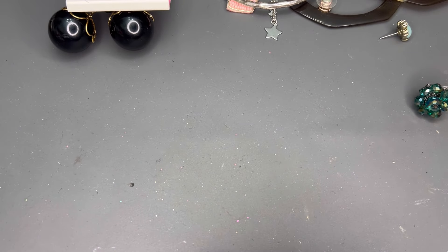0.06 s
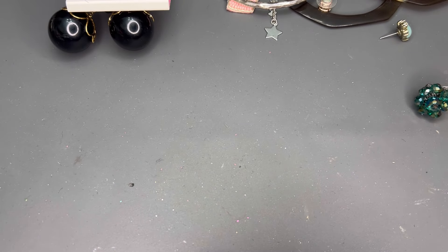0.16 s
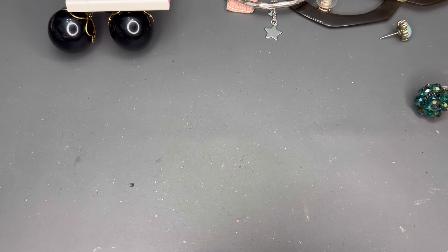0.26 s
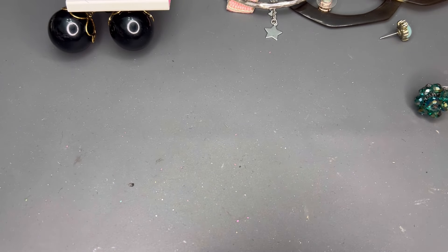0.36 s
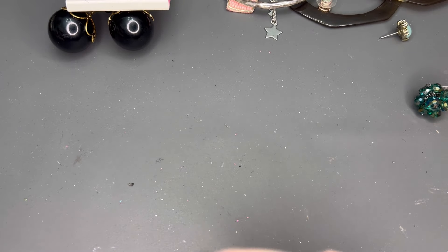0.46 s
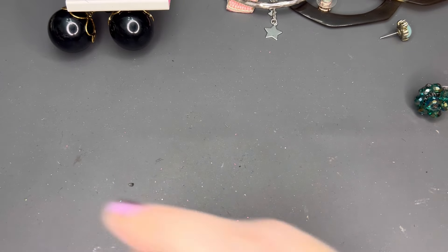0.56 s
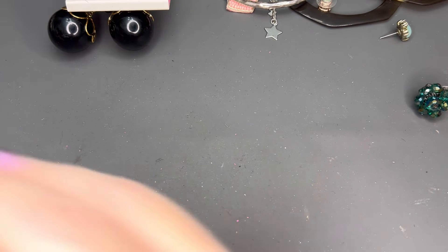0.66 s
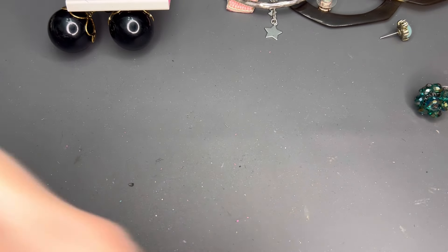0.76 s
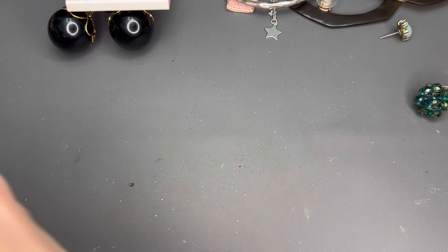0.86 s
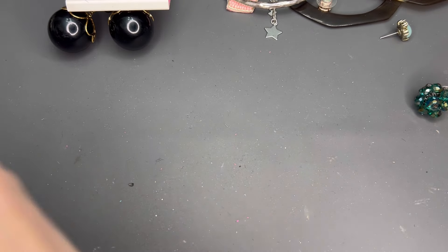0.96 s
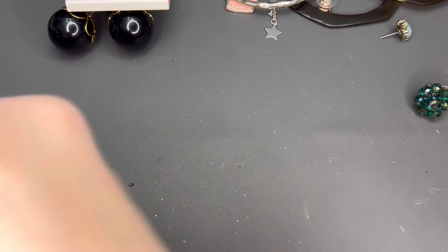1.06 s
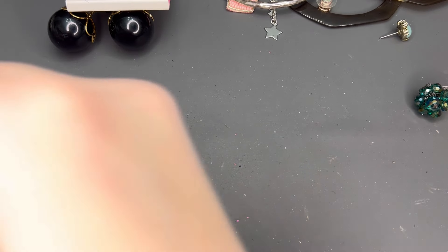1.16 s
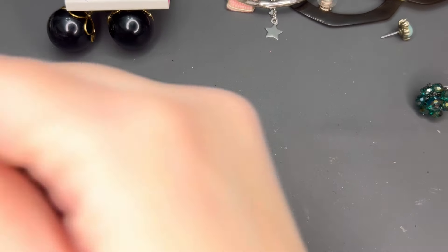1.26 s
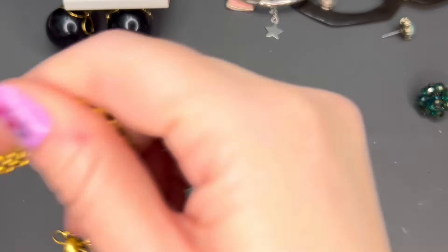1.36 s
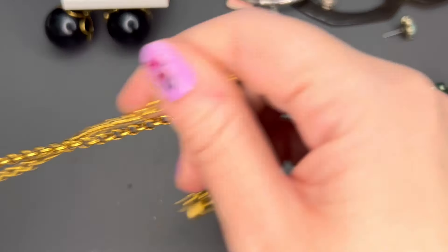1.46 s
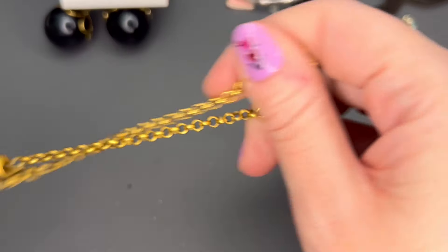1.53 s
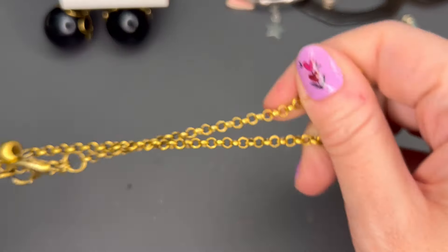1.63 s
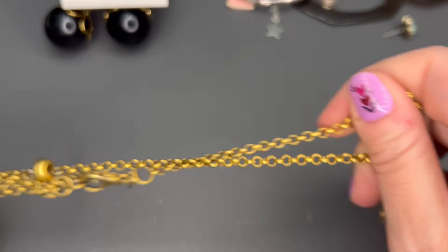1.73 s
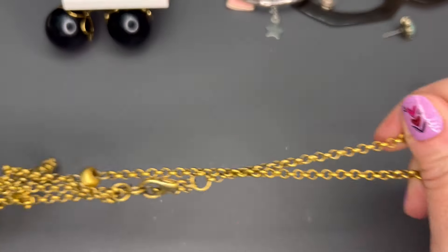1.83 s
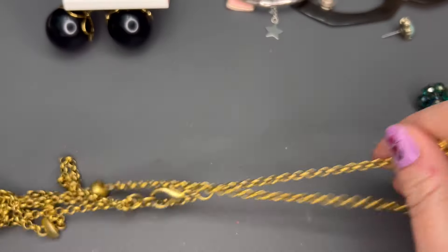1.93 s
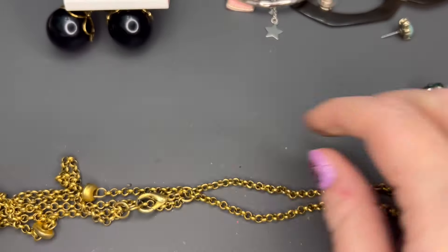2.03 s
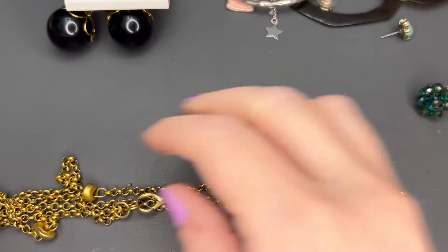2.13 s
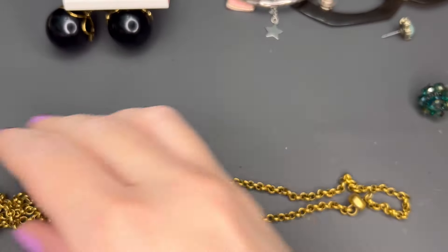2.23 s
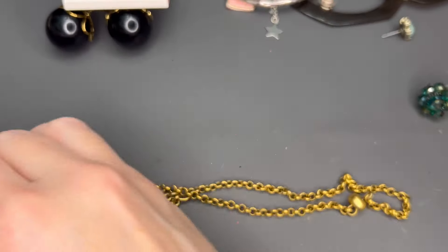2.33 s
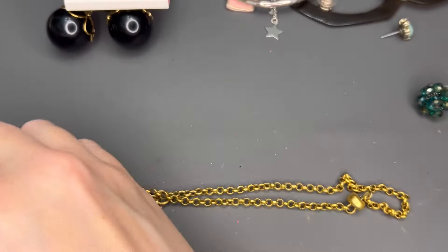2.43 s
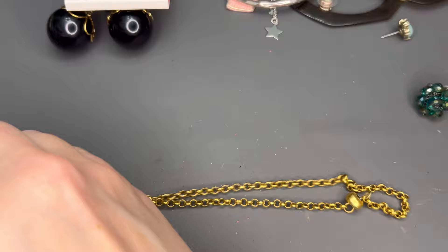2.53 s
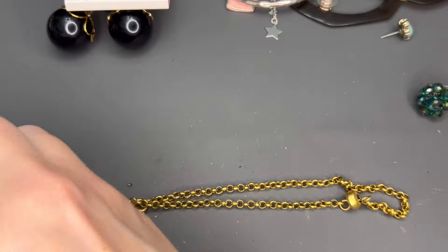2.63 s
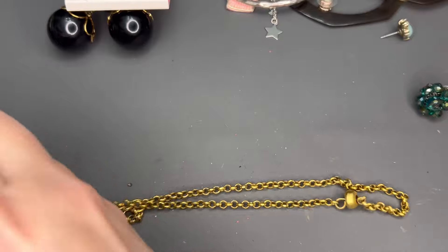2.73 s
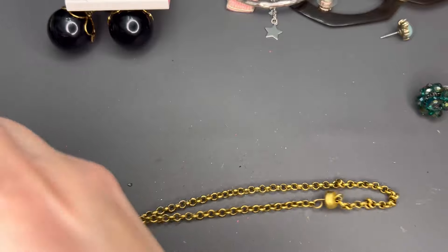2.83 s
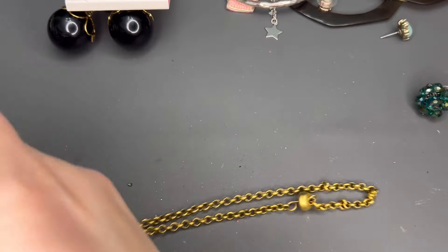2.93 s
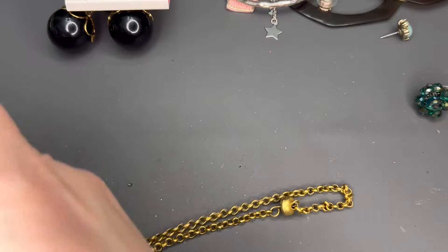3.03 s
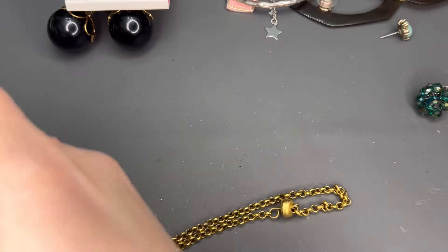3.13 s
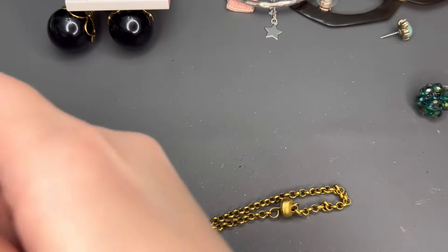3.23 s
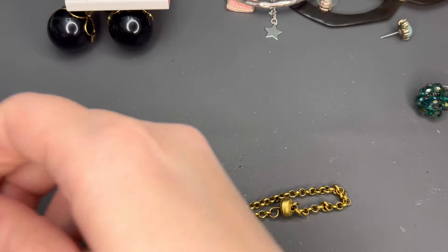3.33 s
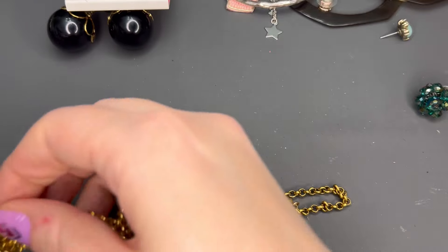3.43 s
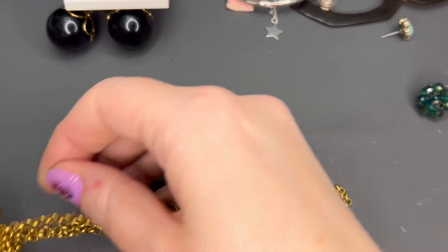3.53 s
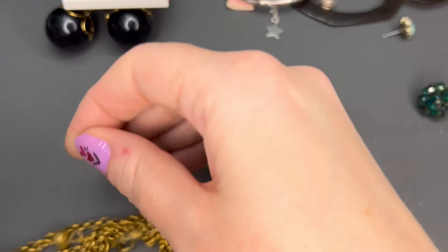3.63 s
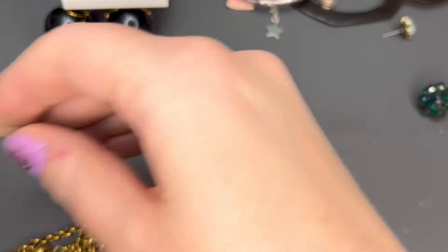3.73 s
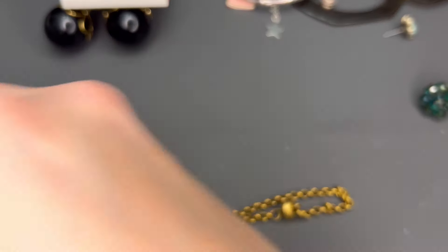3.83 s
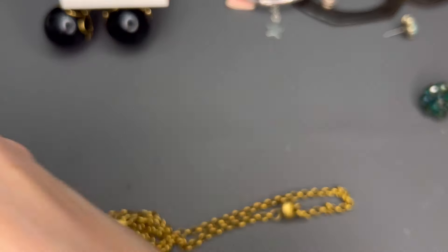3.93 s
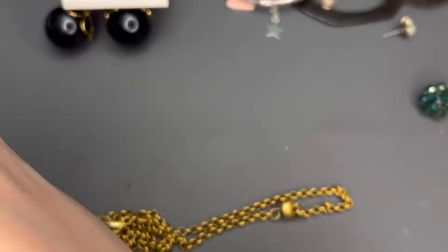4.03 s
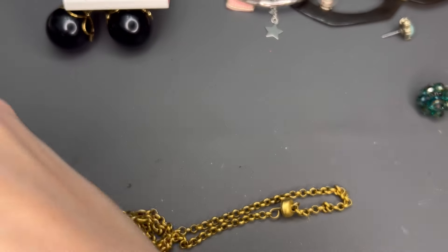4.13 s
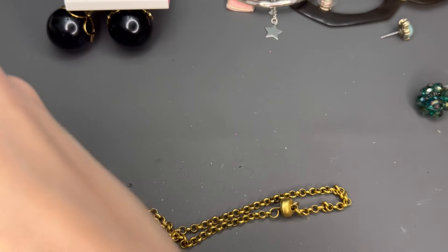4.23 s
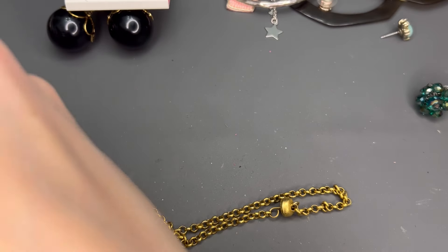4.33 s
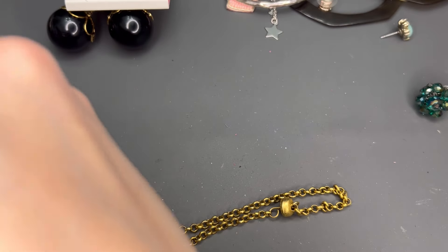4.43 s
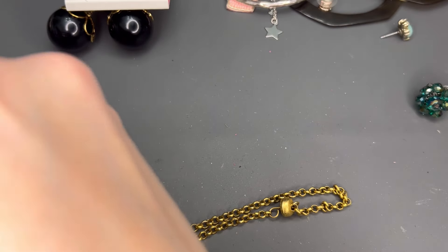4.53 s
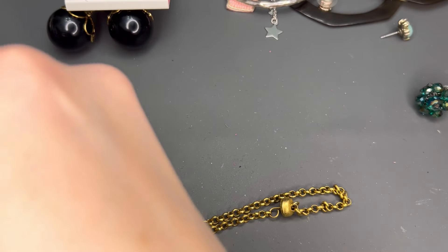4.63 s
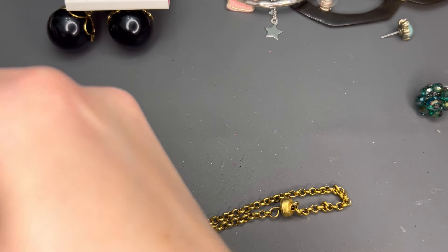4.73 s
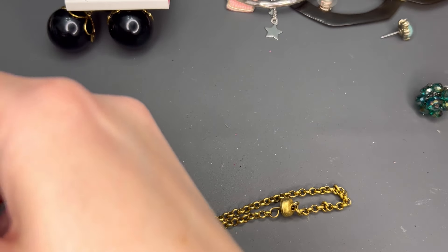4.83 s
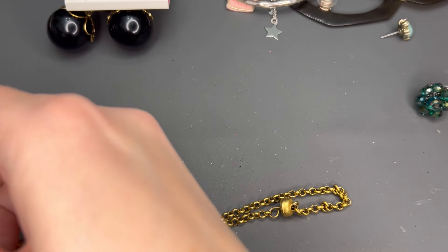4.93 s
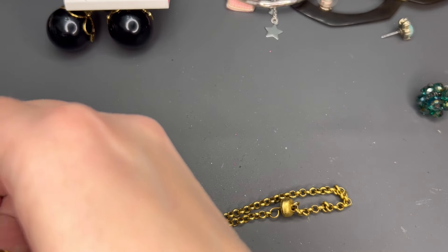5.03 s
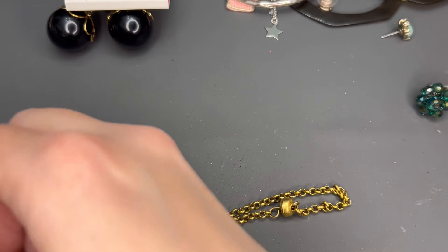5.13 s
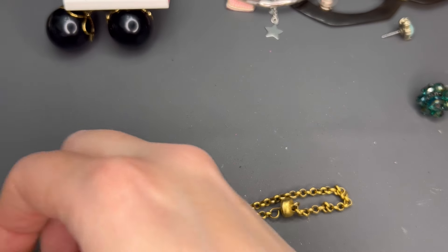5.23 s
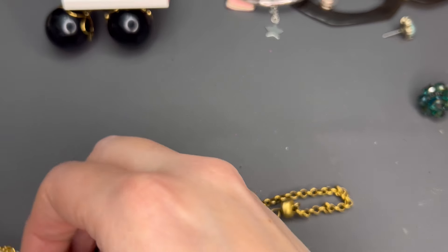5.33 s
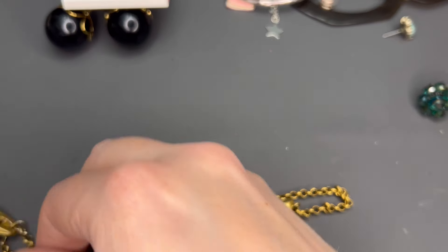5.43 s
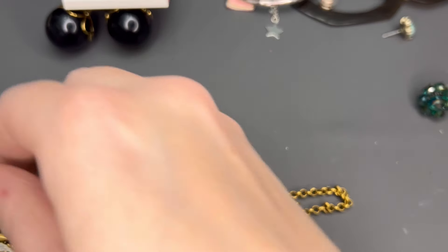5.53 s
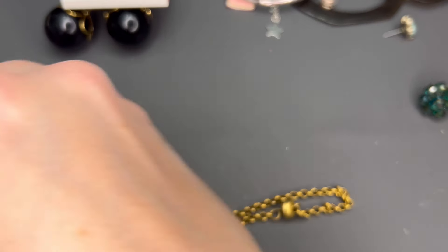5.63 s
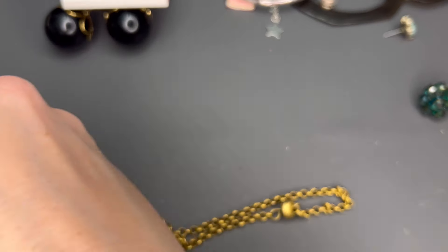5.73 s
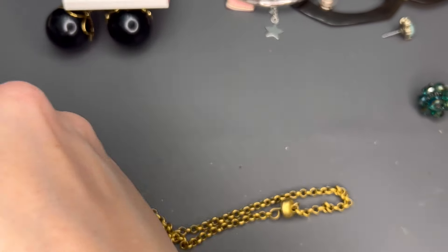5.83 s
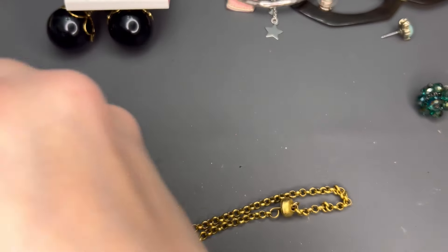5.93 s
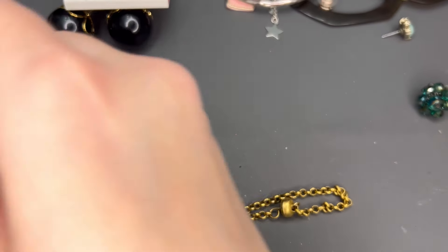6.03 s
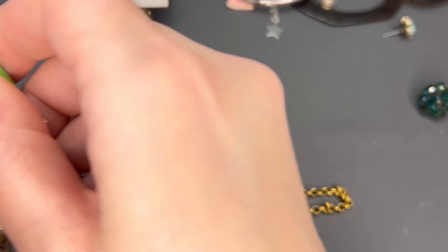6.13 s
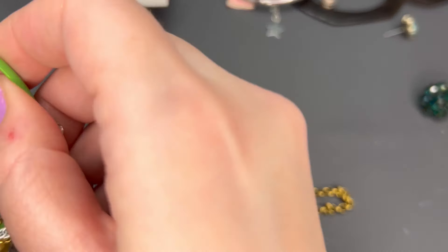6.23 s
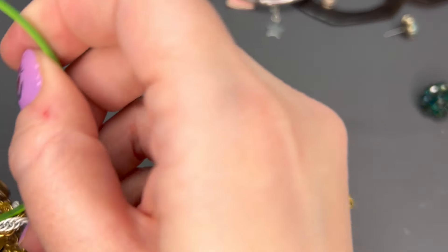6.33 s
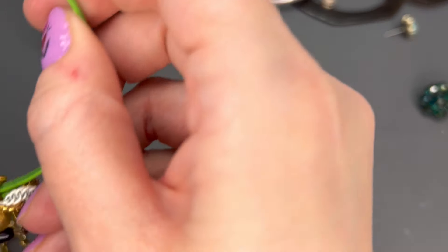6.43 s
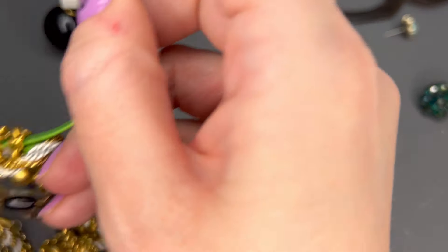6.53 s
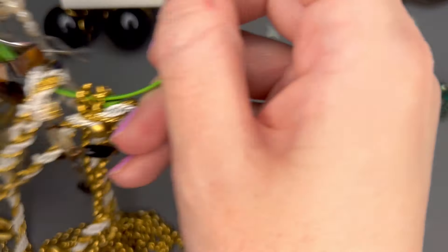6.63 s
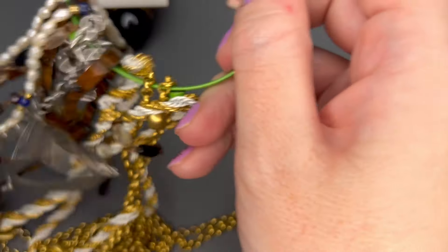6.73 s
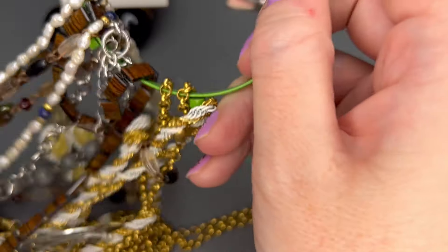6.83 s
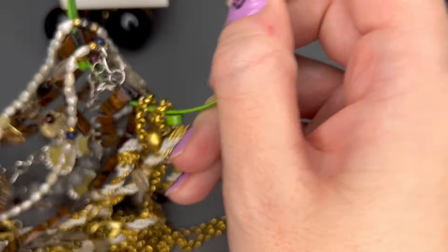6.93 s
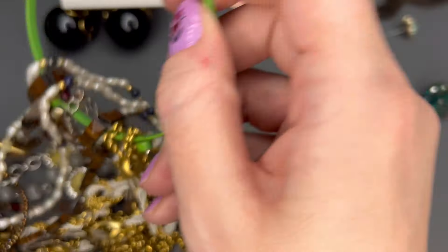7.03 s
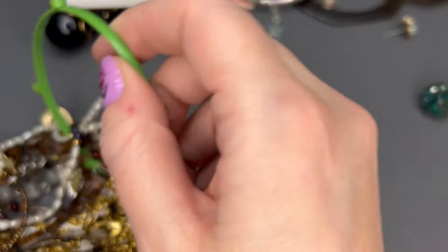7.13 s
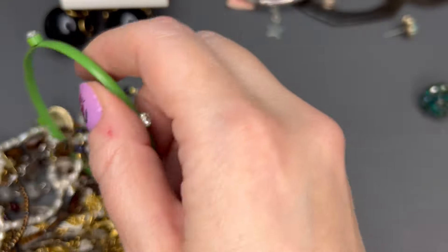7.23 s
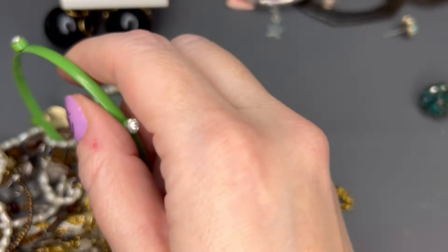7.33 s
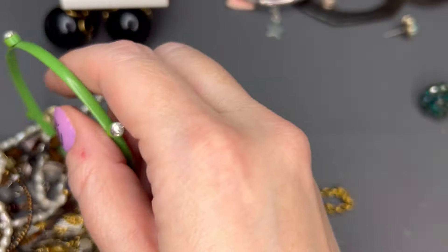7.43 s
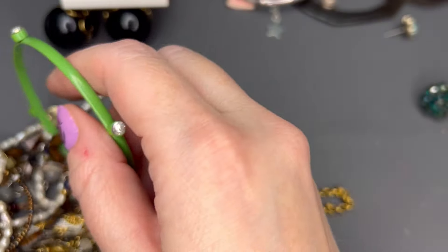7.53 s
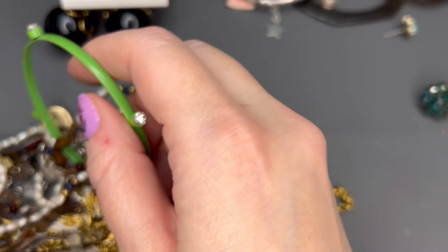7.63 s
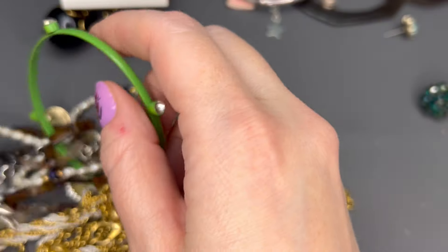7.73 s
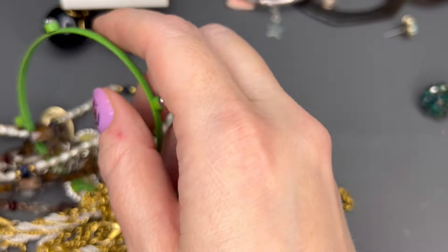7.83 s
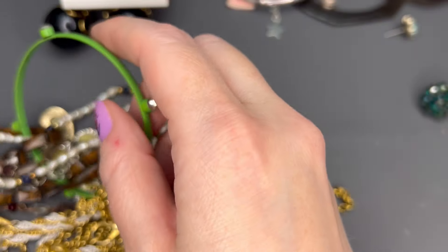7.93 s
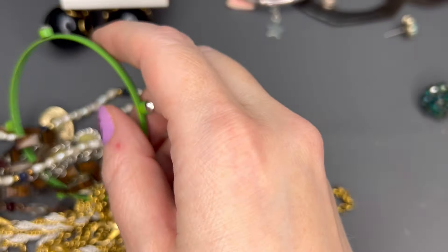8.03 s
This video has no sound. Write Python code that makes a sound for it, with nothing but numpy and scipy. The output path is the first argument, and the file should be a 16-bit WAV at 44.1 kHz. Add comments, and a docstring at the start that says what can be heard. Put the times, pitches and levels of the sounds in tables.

```python
"""At a table in a room with a low hum, a hand stirs a heap of bead necklaces, chains and bangles.
Random contacts ring small bead and link bodies into a bright rustle that tugs lift and pauses drop.
Over it, placed decaying modes and noise bursts make snaps, bare ticks, taps, chain falls and pings;
thumps glide down in pitch and leave the table shaking, as filtered noise. A wavering tone is the hum.
A two-port microphone hears it with a wandering lead and balance."""
import sys
import numpy as np
from scipy import signal
from scipy.io import wavfile
from scipy.ndimage import uniform_filter1d

SR = 44100
rng = np.random.default_rng(int(sys.argv[2]) if len(sys.argv) > 2 else 0)


def dump_mix(stems):
    """Bounce the given channels to the path in sys.argv[1] as a 16-bit WAV at rate SR."""
    frames = np.atleast_2d(stems).T  # one column per channel
    limited = np.clip(frames, -1, 1)  # hard clip at full scale
    pcm = np.round(limited * 32767).astype(np.int16)
    wavfile.write(sys.argv[1], SR, pcm)


N = 355446  # length in samples

# Knuckles and heavy pieces thumping the table.
# Each row: start in seconds, level in dB, height in Hz from which the pitch glides down towards 75 Hz.
THUMP_HITS = [(1.768, -35.5, 710), (3.615, -35.5, 695), (3.643, -34.5, 726), (5.2908, -29.5, 695),
              (5.322, -33, 620), (5.9, -33.5, 986), (6.02, -34, 800), (6.558, -36.5, 962),
              (6.749, -31, 710)]
# Spectrum of contacts on the table top. Each row: frequency in Hz, gain in dB.
TABLE_TONE = [(300, -6), (600, -5.5), (1200, -7), (2300, -1), (3200, -3.5), (4500, -3.5), (6500, -2.5),
              (10000, -8)]
# Spectrum of the shaken table. Each row: frequency in Hz, gain in dB.
SHAKE_TONE = [(25, -35.5), (50, 3.5), (80, 2), (160, -5.5), (330, -5.5), (700, -16.5), (2500, -75.5)]
# Modes of the table top. Each row: frequency in Hz, strength in dB.
BOARD_MODES = [(350, 3.5), (540, -1.5), (850, -6.5), (1050, 0.5), (1225, 1), (1455, 4), (1700, -4),
               (2020, 1.5), (2330, 4), (2870, 0)]


def gain_of(db):
    """Amplitude factor for a level in dB."""
    return 10 ** (np.asarray(db) / 20)


def evened(x):
    """Scale a signal to an RMS of 1."""
    return x / np.sqrt(np.mean(abs(x) ** 2) + 1e-20)


def read(points, hz):
    """Read a curve of (Hz, value) points, straight between points on a log frequency axis."""
    f, value = np.transpose(points)
    return np.interp(np.log(hz + 1), np.log(f + 1), value)


def add(mix, s, sound):
    """Mix a sound in at s seconds, cut off at the end of the mix."""
    part = mix[round(s * SR):][:len(sound)]
    part += sound[:len(part)]


def colour(x, points):
    """Causal filter with the given spectrum (minimum phase)."""
    log_gain = np.log(gain_of(read(points, abs(np.fft.fftfreq(8192, 1 / SR)))))
    response = np.exp(log_gain - 1j * signal.hilbert(log_gain).imag)
    taps = np.fft.ifft(response).real[:4096]
    return signal.oaconvolve(x, taps * np.hanning(8192)[4096:])[:len(x)]


def ring(hz, t60, rise):
    """A decaying mode with a soft start and a peak near 1; t60 and rise in seconds."""
    t = np.arange(round(t60 * SR)) / SR
    shape = gain_of(-60 * t / t60) * (1 - np.exp(-t / rise))
    return shape / shape.max() * np.sin(2 * np.pi * hz * t)


def burst(noise, t60):
    """Noise dying by 60 dB in t60 seconds, scaled to a peak of 1."""
    dying = noise * gain_of(-60 * np.arange(len(noise)) / SR / t60)
    return dying / abs(dying).max()


def clumps(seconds, depth_db):
    """Contacts come in bunches: a strand slips suddenly, then settles."""
    slips = rng.exponential(1, N) * (rng.random(N) < 2 / (seconds * SR))
    settling = signal.lfilter([1], [1, -np.exp(-2 / (seconds * SR))], slips - slips.mean())
    return gain_of(depth_db * evened(settling))


def stir():
    """Gains per sample for beads, links and table: the hand's level, lifted by tugs, lowered in pauses."""
    # How busy the hand is, before tugs and pauses. Each row: time in seconds, beads rubbing in dB,
    # links on the table in dB, table shaken in dB.
    busy = [(0, -59.5, -59.5, -58), (.5, -59.5, -55, -55.5), (.93, -53, -62, -59), (1.0, -61.5, -48.5, -50),
            (1.45, -48, -55, -51.5), (1.85, -48.5, -44.5, -48), (2.25, -55, -49, -54),
            (2.95, -52, -55.5, -58), (3.452, -53, -54.5, -58), (4.15, -63, -60, -59.5),
            (4.7, -56.5, -63, -58), (5.05, -44.5, -52, -53.5), (5.501, -56, -53.5, -51.5),
            (5.799, -44, -52, -56.5), (6.05, -30, -39, -47.5), (6.25, -47, -54, -52.5),
            (6.7, -31.5, -45.5, -49.5), (7.0, -45.5, -49.5, -52.5), (7.35, -49, -54, -56.5),
            (7.65, -30.5, -52.5, -56), (8.06, -52.5, -53.5, -52)]
    # Tugs at the strands, quick to rise and mostly slower to fall. Each row: top in seconds,
    # fall time in seconds, lift of the beads in dB, lift of the links in dB.
    tugs = [(0.2, 0.035, 15, 8.5), (.39, 0.18, 10, -1.5), (0.911, 0.039, 4, 11.5), (1.039, 0.61, 15.5, 4.5),
            (1.358, 0.052, 2, 10), (1.766, 0.027, 10, 10.5), (1.845, 0.038, 11.5, 6),
            (2.464, 0.068, 9, 2.5), (2.614, 0.14, 5.5, 2), (2.784, 0.17, 4, 6), (3.293, 0.082, 4, 8),
            (3.633, 0.12, -3, 13.5), (3.951, 0.044, 18.5, 10.5), (4.081, 0.056, 3, 13.5),
            (4.591, 0.11, 8, 7.5), (4.809, 0.2, 4.5, 7), (5.228, 0.035, 12, 5.5), (5.477, 0.047, 9.5, 4.5),
            (5.915, 0.078, 5.5, 5.5), (6.275, 0.29, 7.5, 9), (6.705, 0.047, 5, 2.5), (6.815, 0.15, 3, 8),
            (7.084, 0.052, 11, -1), (7.263, 0.046, 8.5, 8), (7.603, 0.16, -4.5, 9.5),
            (7.953, 0.074, 12.5, 2)]
    # The strands hang still. Each row: dying from in seconds, stirred again at in seconds,
    # full drop of the beads in dB, full drop of the links in dB.
    pauses = [(-.2, 0.047, 12, 14), (1.907, 2.124, 26, -4), (2.004, 2.127, 9, 26.5), (3.302, 3.507, 10, 8),
              (4.21, 4.52, 15, 19), (5.29, 5.407, 12, 0.5), (5.544, 5.684, 42, 34)]
    tug_rise_s, settle_s, restart_s = 0.049, 0.089, 0.04
    shake_share = 0.19  # the table follows this share of the links' change in dB
    jolt_db, jolt_t60_s = -16, 0.19  # each thump leaves the table shaking

    t = np.arange(0, N + 64, 64) / SR  # one step per 64 samples
    change = 0
    for top, fall_s, *lift_db in tugs:
        tug = np.interp(t, [top - tug_rise_s, top, top + fall_s], [0, 1, 0])
        change = change + np.outer(lift_db, tug)
    for start, end, *drop_db in pauses:
        still = np.clip(np.minimum((t - start) / settle_s, 1 + (end - t) / restart_s), 0, 1)
        change = change - np.outer(drop_db, still)

    times, *levels = np.transpose(busy)
    beads, links, shake = (np.interp(t, times, db) for db in levels)
    shake = gain_of(shake + shake_share * change[1])
    for s, db, _ in THUMP_HITS:
        shake = shake + (t > s) * gain_of(db + jolt_db - 60 * abs(t - s) / jolt_t60_s)
    gains = gain_of(beads + change[0]), gain_of(links + change[1]), shake
    return [np.interp(np.arange(N) / SR, t, g) for g in gains]


def room():
    """Steady filtered noise, and a hum whose strength and phase waver with slow random noise."""
    # Spectrum of the room noise. Each row: frequency in Hz, density in dB per Hz.
    room_tone = [(25, -42), (60, -23), (130, 8), (330, -20), (500, -17.5), (1300, -10.5), (4000, -64),
                 (16000, -66)]
    room_db, hum_db, hum_hz, hum_width_hz = -62, -60.5, 120, 12
    air, a, b = rng.standard_normal((3, N))
    r = np.exp(-np.pi * hum_width_hz / SR)
    waver = 1.3 + evened(signal.lfilter([1 - r], [1, -r], a + 1j * b))
    hum = (waver * np.exp(2j * np.pi * hum_hz * np.arange(N) / SR)).real
    return gain_of(room_db) * evened(colour(air, room_tone)) + gain_of(hum_db) * evened(hum)


def table_rumble(shaking):
    """The shaken table rumbles: low noise in bunches, following the stirring and the thumps."""
    rumble = colour(rng.standard_normal(N), SHAKE_TONE)
    return shaking * evened(rumble * clumps(.03, 2.2))


def thump(noise, hz):
    """Bending waves in the table top: high ones arrive first, low ones trail in; two low modes ring on."""
    t = np.arange(len(noise)) / SR
    pitch = 75 + hz / (1 + t / 0.00385)
    wave = gain_of(-60 * t / .065) * np.sin(2 * np.pi * np.cumsum(pitch) / SR)
    wave = wave + 0.82 * burst(colour(noise, SHAKE_TONE), 0.058)
    for mode_hz, db in BOARD_MODES[:2]:
        add(wave, 0, gain_of(db - 15) * ring(mode_hz, 0.096, 0.00094))
    return wave


def thumps():
    """Each heavy blow sets off bending waves in the table top."""
    out = np.zeros(N)
    for s, db, hz in THUMP_HITS:
        add(out, s, gain_of(db) * thump(rng.standard_normal(5000), hz))
    return out


def knock(noise, hz):
    """The table top answers a contact with a dull crack and a few short modes; low modes ring longer."""
    body = 1.5 * burst(colour(noise, TABLE_TONE), .012)
    add(body, 0, 0.16 * ring(BOARD_MODES[1][0], 0.026, 0.00054))
    for ratio, size in [(1, 1), (1.6, .4)]:
        add(body, 0, size * ring(hz * ratio, 0.0055 + 9 / hz, 0.00035))
    return body


def taps():
    """Links and clasps strike the table, each exciting a knock at its own pitch."""
    # Each row: start in seconds, level in dB, main mode in Hz.
    strikes = [(0.121, -41, 2700), (0.138, -30, 614), (0.199, -36.5, 2810), (0.233, -29.5, 2280),
               (0.279, -46, 570), (0.326, -47, 560), (0.3412, -29, 2400), (0.512, -26.5, 3650),
               (1.24, -34.5, 1110), (2.175, -36, 2200), (2.791, -42, 2660), (3.042, -38.5, 515),
               (4.057, -35, 3230), (4.217, -43, 2230), (4.588, -45.5, 583), (4.964, -30, 2330),
               (5.029, -34, 656), (5.3475, -32.5, 2058), (5.706, -42, 2560), (5.879, -33.5, 760),
               (6.018, -33, 2500), (6.0455, -25, 2530), (6.268, -27, 2520), (6.394, -29.5, 2410),
               (6.5575, -32, 700), (6.582, -34.5, 2400), (6.689, -30.5, 3470), (6.937, -27, 1840),
               (7.058, -34.5, 1950), (7.153, -34, 2030), (7.58, -32, 2170)]
    out = np.zeros(N)
    for s, db, hz in strikes:
        add(out, s, gain_of(db) * knock(rng.standard_normal(1200), hz))
    return out


def chain_fall(seconds, fade_db, top_hz):
    """Links land a few milliseconds apart; each rings the table modes in its own mix, dull above top_hz."""
    out = np.zeros(round(seconds * SR) + 1500)
    for s in np.arange(0, seconds, .0026):
        late, size, mix = rng.random(), rng.standard_normal(), rng.standard_normal(len(BOARD_MODES))
        # the first link has a set level and moment, the others vary
        level = gain_of(3.4 * size * (s > 0) + 2.9 * (s == 0) + fade_db * s / seconds)
        at = s + 0.0017 * late * (s > 0)
        add(out, at, level * 5.0 * burst(rng.standard_normal(60), 0.0019))
        for (hz, db), share in zip(BOARD_MODES, mix):
            add(out, at, level * share * gain_of(db) * ring(hz, 0.0065 + 8 / hz, 0.000079))
    dull = [(300, -14), (.4 * top_hz, 0), (top_hz, 0), (1.6 * top_hz, -8), (4 * top_hz, -28)]  # (Hz, dB)
    return evened(colour(out, dull))


def chain_falls():
    """Lengths of chain fall on the table link after link."""
    # Each row: start in seconds, end in seconds, level in dB, drift of the link level by the end in dB,
    # dull above in Hz.
    drops = [(1.747, 1.77, -46, -15, 3620), (1.919, 1.939, -46, 0.5, 2280), (1.942, 1.96, -35.5, 5, 2270),
             (1.961, 1.972, -32, -4, 2320), (1.975, 2.012, -35.5, -5.5, 2420),
             (3.6121, 3.663, -36.5, -10, 2890), (5.271, 5.294, -42.5, -1.5, 4600)]
    out = np.zeros(N)
    for s, end, db, fade_db, hz in drops:
        add(out, s, gain_of(db) * chain_fall(end - s, fade_db, hz))
    return out


def pings():
    """Small metal parts ring until a touch damps them."""
    # Each row: start in seconds, level in dB, pitch in Hz, free decay by 60 dB in seconds,
    # damped after in seconds.
    metal = [(6.346, -33, 8900, .1, .012), (6.7535, -27, 13890, .045, .011),
             (6.7616, -10.5, 8863, .16, .024)]
    out = np.zeros(N)
    for s, db, hz, t60, damped in metal:
        tone = ring(hz, t60, .0004)
        late = np.maximum(np.arange(len(tone)) / SR - damped, 0)
        add(out, s, gain_of(db - 1500 * late) * tone)  # the touch takes 1500 dB per second
    return out


def crack(noise):
    """A hard contact: a few milliseconds of bright splinters."""
    return burst(0.46 * np.diff(noise) + noise[1:], .007)


def ticks():
    """Hard edges meet in a bare click with no ring."""
    # Each row: start in seconds, level in dB.
    clicks = [(0.152, -40), (0.2337, -13), (0.2802, -25), (.667, -22), (1.112, -32), (1.499, -24),
              (1.633, -17), (1.672, -13.5), (1.732, -32), (1.7532, -11), (1.767, -14), (1.861, -25),
              (2.174, -23), (2.1778, -16.5), (2.218, -28), (2.224, -29), (2.348, -28), (2.408, -19),
              (2.456, -12), (2.5184, -30), (2.665, -16.5), (3.1865, -41), (3.282, -19.5), (3.652, -24.5),
              (4.509, -40.5), (4.9225, -33), (5.4656, -30), (5.7475, -20), (5.776, -41), (5.808, -21.5),
              (6.022, -7.5), (6.025, -9), (6.032, -16), (6.529, -30), (7.045, -21), (7.2042, -23),
              (7.2899, -16.5), (7.592, -14), (7.945, -27), (8.046, -23.5)]
    out = np.zeros(N)
    for s, db in clicks:
        add(out, s, gain_of(db) * crack(rng.standard_normal(800)))
    return out


def snaps():
    """Single beads snap together: a very short ring and a broad crack."""
    # Each row: start in seconds, level of the ring in dB, ring in Hz,
    # crack against the ring in dB before a 6 dB lift.
    bead_hits = [(0.3411, -27.5, 4460, 3), (0.512, -12.5, 11100, -4.5), (0.5471, -18.5, 11000, -3.5),
                 (0.5573, -37, 11200, -15), (0.5737, -20.5, 10500, -1.5), (0.846, -27, 9500, -9),
                 (0.8954, -22, 15100, -9), (1.033, -28.5, 6900, -12), (1.148, -31, 6600, -2),
                 (1.1675, -38, 11300, -9), (1.24, -18.5, 9100, -6), (2.241, -29, 7100, -3),
                 (2.267, -26.5, 8500, -1.5), (2.6008, -33, 4120, -7), (2.74, -33, 11100, -12),
                 (3.5296, -33, 12050, 1.5), (3.848, -29, 9260, -8.5), (4.986, -35, 11300, -15),
                 (5.1122, -18, 11100, -4.5), (5.221, -28, 6846, -4), (5.412, -30.5, 9600, -2.5),
                 (5.819, -27.5, 9600, -4), (5.894, -23.5, 6570, 1), (5.9075, -21.5, 6760, -2),
                 (6.2604, -25.5, 4360, 0), (6.347, -25, 11100, -19), (6.505, -32, 4050, -10),
                 (6.525, -25, 10600, -22), (6.5458, -21, 11100, -19), (6.6558, -18, 9900, -22),
                 (6.6684, -16.5, 11300, -2), (6.7094, -15, 10600, -10), (6.753, -11.5, 11300, -18),
                 (6.7604, -8, 9800, -21), (6.8096, -22, 11000, -7), (6.83, -17, 10700, -15),
                 (6.8365, -17, 11200, -24), (6.8426, -18, 11100, -33), (6.8577, -7.5, 11100, -36),
                 (6.866, -21, 11150.0, -25), (6.9076, -8, 10860, -37), (6.9378, -16, 11000, -25),
                 (6.949, -3, 11170, -46), (6.9543, -18, 11100, -30), (6.9867, -13.5, 11200, -41),
                 (6.992, -13, 11100, -22), (7.013, -6, 11040, -32), (7.056, -24, 11100, -17),
                 (7.0667, -12, 10400, -37), (7.071, -24, 8100, -17), (7.0797, -15.5, 11400, -33),
                 (7.1615, -25, 10000, -2), (7.2192, -26, 10000, -2), (7.579, -22, 10600, -19),
                 (7.704, -27, 10080.0, -1.5)]
    out = np.zeros(N)
    for s, db, hz, crack_db in bead_hits:
        add(out, s, gain_of(db) * ring(hz, 0.0036, 0.00025))
        add(out, s, gain_of(db + crack_db + 6.0) * crack(rng.standard_normal(800)))
    return out


def patter(size, lo_hz, hi_hz, t60, tick, count=32):
    """Each contact rings one of many small bodies with three modes and a tick."""
    body = rng.integers(0, count, N)  # which body a contact would ring
    out = tick * size
    for k, draw in enumerate(rng.random((count, 3))):
        modes = sum(ring(f, t60, .0001) for f in lo_hz * (hi_hz / lo_hz) ** draw)
        out = out + signal.oaconvolve(size * (body == k), modes / np.linalg.norm(modes))[:N]
    return evened(out)


def rustle(rubbing, ticking):
    """The same contacts ring the beads and tick on the table, in bunches."""
    # Spectrum of the beads. Each row: frequency in Hz, gain in dB.
    bead_tone = [(1500, -32.5), (3000, -20), (5500, -9.5), (7500, -5), (9000, 0), (11000, 0.5),
                 (13200, -10), (15200, -2)]
    size = gain_of(3.04 * np.minimum(rng.exponential(1, N), 4.5))
    size = size * (rng.random(N) < 2600 / SR)  # contacts per second
    size = size + gain_of(14) * (rng.random(N) < 70 / SR)  # a link catches and lets go
    size = size * rng.choice([-1., 1.], N) * clumps(0.0065, 0.89)
    sliding = .38 * rng.standard_normal((2, N))  # strands and skin sliding
    bunch = clumps(0.025, 2.2)
    beads = (patter(size, 2380, 15880, 0.0041, 1.0) + sliding[0]) * bunch
    links = (patter(size, 737, 5416, 0.011, 0.54) + sliding[1]) * bunch
    return rubbing * evened(colour(beads, bead_tone)) + ticking * evened(colour(links, TABLE_TONE))


def reflections(near):
    """Nearby walls return a short, dense tail of decaying noise."""
    tail = rng.standard_normal(4000) * gain_of(-60 * np.arange(4000) / SR / .1)
    return gain_of(-20) * signal.oaconvolve(near, tail / np.linalg.norm(tail))[:N]


def ports(x):
    """Two ports hear one sound with a lead and balance set per frequency that wander at random."""
    # Each row: frequency in Hz, radians by which the left port leads.
    lead_points = [(0, 0), (500, .9), (1500, 1.5), (2100, .3), (3100, .6), (5100, .2), (6200, -.9),
                   (6800, .2), (8200, -.4), (9450, -3.14), (13500, -9.42), (15200, -12.4)]
    # Each row: frequency in Hz, left over right in dB.
    balance = [(60, .5), (350, 0), (900, 4), (4500, 3), (6800, .5), (15000, 0)]
    # Each row: frequency in Hz, likeness of the two ports from 0 to 1.
    likeness = [(60, 0.85), (300, 0.8), (1300, 0.45), (2500, 0.7), (6000, 0.7), (8000, 0.98), (13800, 0.96),
                (15500, 0.7)]
    hz, t, z = signal.stft(x, SR, nperseg=512, noverlap=384)
    wander = rng.standard_normal((len(t), len(hz), 2))
    late, loud = uniform_filter1d(uniform_filter1d(wander, 3, 0), 5, 1).T  # smooth in time, then frequency
    spread = np.sqrt(-2 * np.log(np.clip(read(likeness, hz), .05, 1)))[:, None]
    lead = np.interp(hz, *np.transpose(lead_points))[:, None] + spread * evened(late)
    half_db = read(balance, hz)[:, None] / 2 + 0.82 * spread * evened(loud)
    tilt = gain_of(half_db) * np.exp(.5j * lead)  # half to the left, the inverse to the right
    return signal.istft(np.array([tilt, 1 / tilt]) * z, SR, nperseg=512, noverlap=384)[1][:, :N]


def scene():
    """The near contacts get wall reflections; rumble and room join them at the two ports."""
    rubbing, ticking, shaking = stir()
    lows = room() + table_rumble(shaking)
    on_table = thumps() + taps() + chain_falls()
    near = on_table + pings() + ticks() + snaps() + rustle(rubbing, ticking)
    return ports(near + reflections(near) + lows)


def record(dry):
    """The deepest bass is cut; a steep treble shelf, then the band limit."""
    treble_hz, treble_db, edge_hz = 15780, -28, 16700
    dry = signal.sosfilt(signal.butter(2, 36, "high", fs=SR, output="sos"), dry)
    below = signal.firwin(511, treble_hz, window=("kaiser", 5), fs=SR)
    edge = signal.firwin(511, edge_hz, window=("kaiser", 9), fs=SR)
    shelf = gain_of(treble_db)
    return signal.oaconvolve(dry, ((1 - shelf) * below + shelf * edge)[None], "same")


dry = scene()
out = record(dry)
dump_mix(out)
```